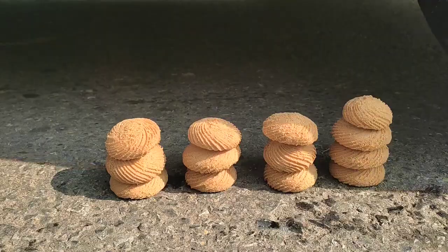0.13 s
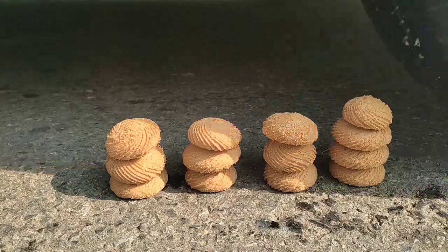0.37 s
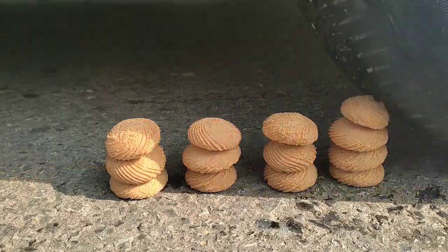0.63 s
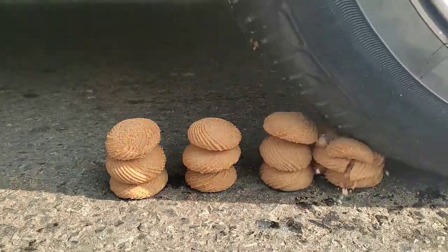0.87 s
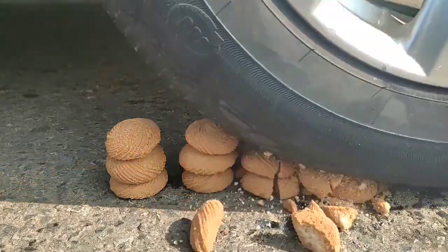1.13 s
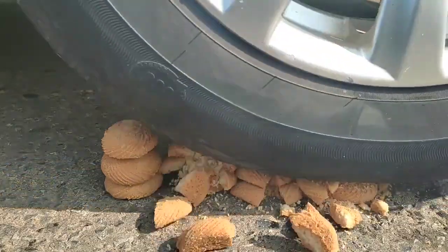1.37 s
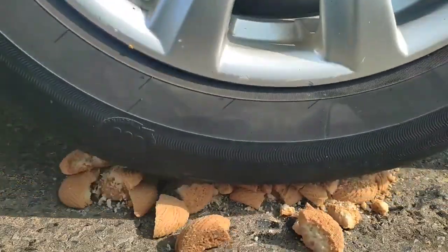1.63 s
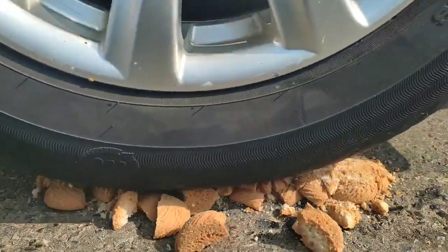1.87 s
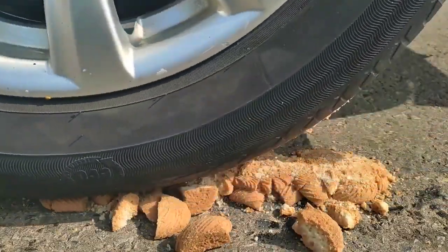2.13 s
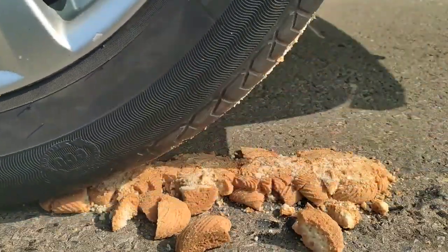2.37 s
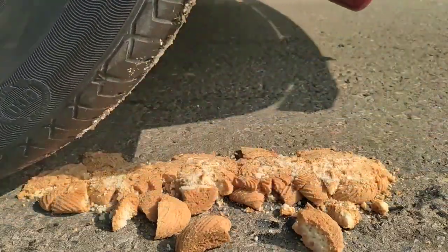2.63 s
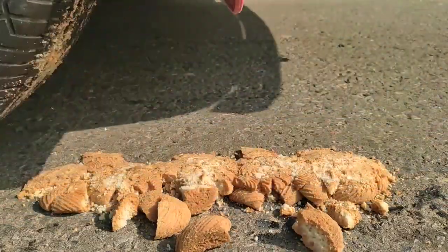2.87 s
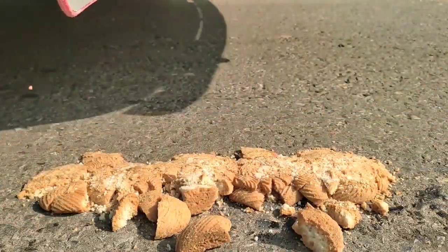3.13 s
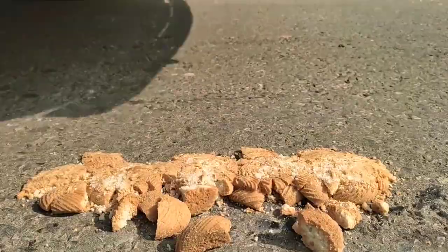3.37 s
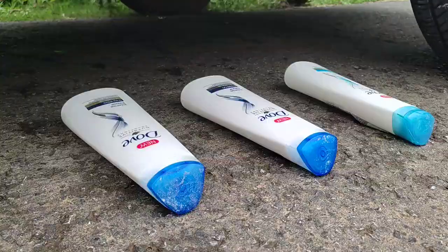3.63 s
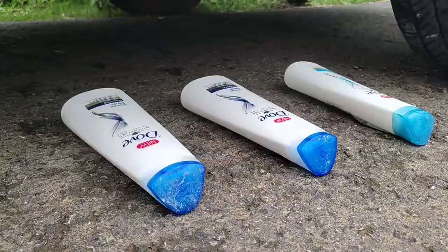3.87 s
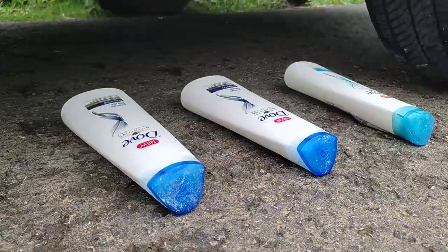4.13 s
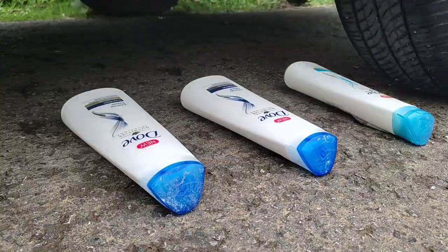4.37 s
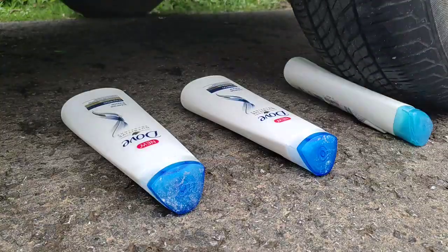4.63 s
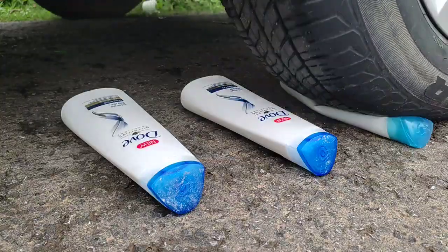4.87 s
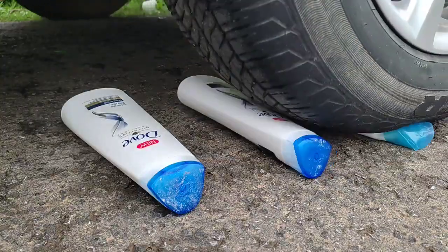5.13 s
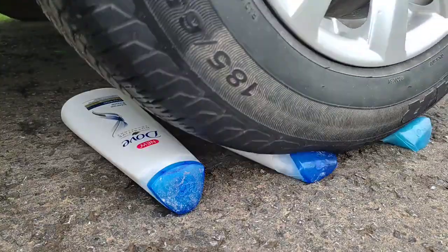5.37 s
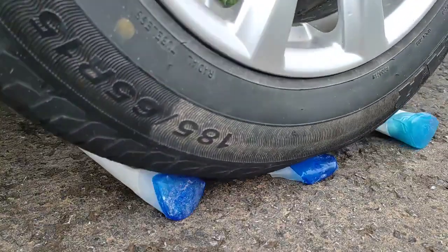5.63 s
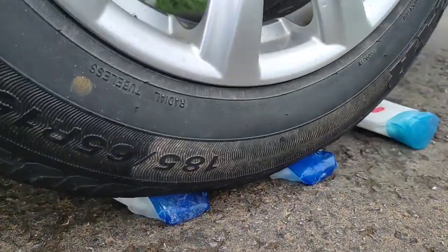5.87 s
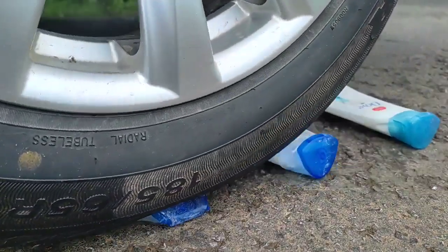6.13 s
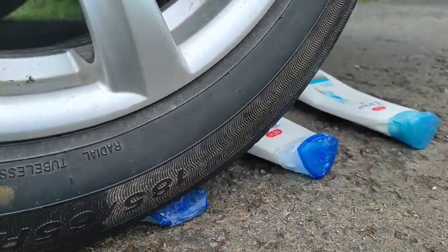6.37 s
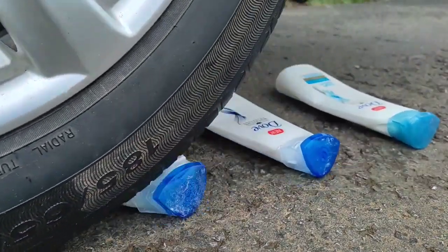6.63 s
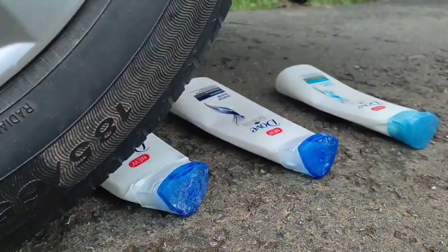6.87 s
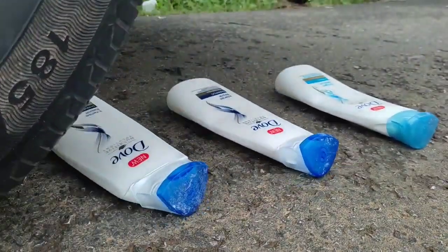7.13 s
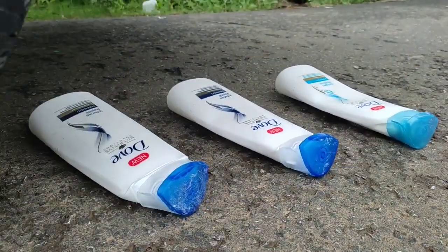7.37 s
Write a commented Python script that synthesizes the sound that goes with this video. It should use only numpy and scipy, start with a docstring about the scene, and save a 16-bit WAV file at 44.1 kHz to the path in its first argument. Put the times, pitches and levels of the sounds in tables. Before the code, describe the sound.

Dry biscuits crunch and crackle under a slow car tyre, then after a brief gap empty plastic bottles pop, hiss and crack loudly.

```python
"""Biscuits crunch, crackle and snap under a slowly creeping car tyre, close to the microphone; after a short silence
it rolls over three empty plastic bottles: walls pop and creak, caps hiss, plastic cracks, the last bottle knocks on.
Crushing and hissing are random grains shaped by filters and level curves; cracks and snaps are noise bursts;
popping walls and knocks are decaying resonances. Coloured outdoor noise lies beneath both places."""
import sys
import numpy as np
from scipy import signal
from scipy.fft import rfft, irfft
from scipy.io import wavfile
from scipy.ndimage import uniform_filter1d

SR = 44100
rng = np.random.default_rng(int(sys.argv[2]) if len(sys.argv) > 2 else 0)


def put_to_file(sound):
    """Save the sound as 16-bit audio at rate SR, in the file named by the first command-line argument."""
    columns = np.atleast_2d(sound).T  # one column per channel
    safe = np.clip(columns, -1, 1)
    whole_steps = np.round(safe * 32767)
    wavfile.write(sys.argv[1], SR, whole_steps.astype(np.int16))


def invert_db(level):
    """Linear amplitude ratio for a level in decibels (20 dB per decade), elementwise."""
    return 10 ** (np.asarray(level, dtype=float) / 20)


N = 330511
T = np.arange(N) / SR
PAUSE_START_S, PAUSE_END_S = 3.467, 3.6  # silence between the biscuits and the bottles
RUN_UP_MS = 1.0  # crackle ahead of each sudden break

# bottle wall resonances: (f/Hz, level/dB, t60/s)
WALL_MODES = [(338, -4, 0.034), (465, -8, 0.063), (789, -4.5, 0.069), (863.5, 5.5, 0.057), (969, -2, 0.045),
              (1500, -22, 0.045)]
# noise spectrum of the second place, where the bottles lie: (f/Hz, level/dB)
LANE_SPECTRUM = [(15, -61), (25, -59), (51, -12.5), (113, -1), (257, -10.5), (318, -14), (460, -12.5),
                 (525, -23.5), (781, -18.5), (1400, -26.5), (2710, -26), (3930, -29.5), (5900, -32),
                 (8000, -38), (11000, -30), (14000, -32.5)]


def level(x, db=0):
    """Scale to an rms level."""
    return x * invert_db(db) / np.sqrt(np.mean(x ** 2))


def peak(y, db):
    """Scale so that the mid (first row) peaks at a level."""
    return y * invert_db(db) / np.abs(np.atleast_2d(y)[0]).max()


def add(out, s, y):
    """Mix y in at time s."""
    i = int(s * SR)
    out[..., i:i + y.shape[-1]] += y[..., :max(N - i, 0)]


def colour(x, points):
    """Causal minimum-phase filter through (Hz, dB) points, from the cepstrum of the log gain."""
    hz, db = np.transpose(points)
    grid_hz = np.fft.rfftfreq(4096, 1 / SR)
    log_gain = np.interp(np.log(grid_hz + 1), np.log(hz), db) * np.log(10) / 20
    cepstrum = irfft(log_gain)
    # fold the backward half onto the forward half
    cepstrum[1:2048] *= 2
    cepstrum[2049:] = 0
    impulse = irfft(np.exp(rfft(cepstrum)))
    return signal.oaconvolve(np.atleast_2d(x), impulse[None], axes=1)[:, :N]


def band(x, lo_hz, hi_hz, order=2):
    """Band-pass."""
    return signal.sosfilt(signal.butter(order, [lo_hz, hi_hz], "band", fs=SR, output="sos"), x)


def curves(rows):
    """Gate over the span of a curve table, and its columns interpolated over time."""
    s, *columns = np.transpose(rows)
    return (T >= s[0]) & (T <= s[-1]), [np.interp(T, s, c) for c in columns]


def swells(s, length_s, db, rise, fall, growth=0):
    """Gain of events that rise, hold (growing) and fall at steady dB per second, summed as power."""
    coarse = T[::32]
    since = coarse - np.asarray(s)[:, None]
    hold = length_s[:, None]
    shape_db = rise * np.minimum(since, 0) + growth * np.clip(since, 0, hold) - fall * np.maximum(since - hold, 0)
    power = np.sum(invert_db(np.asarray(db)[:, None] + shape_db) ** 2, axis=0)
    return np.interp(T, coarse, np.sqrt(power))


def walk(rate):
    """Random levels, rate new ones per second, joined by straight slopes."""
    k = int(SR / rate)
    return uniform_filter1d(np.repeat(rng.standard_normal(N // k + 1), k), k)[:N]


def grains(per_s, spread_db, bed):
    """Mid and side of random breakages of uneven size and place, over a bed of finer ones."""
    hit, size, noise = rng.random(N), rng.exponential(size=N), rng.standard_normal((4, N))
    size = (hit < per_s / SR) * invert_db(spread_db * np.minimum(size, 3))
    return level(size * np.sign(noise[:2])) + bed * noise[2:]


def patchy(x, depth_db, rate):
    """Narrow bands swell and fade on their own, as gaps and cavities change shape."""
    edges = np.geomspace(700, 15000, 36)
    return x + sum(band(x, lo, hi) * (invert_db(depth_db * walk(rate)) - 1) for lo, hi in zip(edges, edges[1:]))


def bent(x, share, rate):
    """All resonances drift up and down together as the plastic changes shape."""
    bend = share * walk(rate)
    # a wandering read position, kept from drifting away over half a second
    place = np.arange(N) + np.cumsum(bend - uniform_filter1d(bend, SR // 2))
    return np.array([np.interp(place, np.arange(N), row) for row in x])


def ring(modes, push_ms, phase):
    """Modes set ringing by a push of finite length, peak 1."""
    t = np.arange(SR // 5) / SR
    y = np.zeros(len(t))
    for (hz, db, t60), p in zip(modes, phase):
        y += invert_db(db) * np.sin(2 * np.pi * hz * t + p) * np.exp(-np.log(1000) * t / t60)
    y = y * (1 - np.exp(-(t / (push_ms / 1000)) ** 2))
    return y / np.abs(y).max()


def burst(noise, click_ms, t60_ms, tail_db=-4):
    """A crackle that runs up to a sudden break, then a noise click with a weaker, longer tail."""
    ms = 1000 * np.arange(noise.shape[-1]) / SR - RUN_UP_MS
    # the break itself: one strong sample, in the mid only
    onset = 9.7 * (np.arange(len(ms)) == np.argmax(ms >= 0)) * np.array([[1], [0]])
    after = np.exp(-ms / click_ms) + invert_db(tail_db) * np.exp(-np.log(1000) * ms / t60_ms)
    return onset + noise * np.where(ms < 0, (1 + ms / RUN_UP_MS) ** 2, after)


def crushed_biscuits():
    """Big lumps crush dully, crumbs crackle and dust fizzes, all in clumps; heavier load crushes bigger lumps."""
    # crumb spectrum: (f/Hz, level/dB)
    crumb_spectrum = [(29, -34), (50, -23), (108, 3.5), (160, -3), (192, 5.5), (248, -5), (338, -0.5),
                      (516, -13), (623, -7.5), (847, -10.5), (5080, -22.5), (8330, -21), (11100, -16),
                      (14000, -21)]
    # tyre grinding the crumbs: (t/s, crackle level/dB, fine dust re crackle/dB)
    grind_curve = [(0, -53, -2), (0.3, -57.5, 2), (0.48, -47.5, -0.5), (0.56, -58, 12.5),
                   (0.72, -52.5, 9.5), (0.765, -44, 9.5), (0.79, -48, 10), (0.9, -32.5, -1.5),
                   (1.24, -32.5, -0.5), (1.55, -34, -11.5), (1.75, -37.5, 2), (2.2, -42, -6.5),
                   (2.3, -45.5, -0.5), (2.45, -54, 1.5), (2.7, -57, -3), (2.95, -62, -11), (3.07, -58, 5),
                   (3.2, -61, -15), (3.46, -51, -4)]
    # stacks and big lumps caving in: (t/s, length/s, dull crush level/dB, dust level/dB)
    cave_ins = [(0.204, 0.018, -44.5, -50.5), (0.3, 0.024, -40.5, -47.5), (0.428, .03, -43, -60),
                (0.448, 0.025, -38, -64), (0.772, 0.015, -32, -28.5), (0.822, 0.025, -32.5, -29.5),
                (0.917, 0.045, -24.5, -37.5), (1.049, 0.037, -26.5, -36.5), (1.18, .01, -48, -41),
                (1.294, 0.014, -28, -30), (1.373, 0.081, -27.5, -35.5), (1.533, 0.052, -26.5, -32.5),
                (1.442, 0.11, -36, -35.5), (1.747, 0.2, -30.5, -63), (1.98, 0.089, -33, -36.5),
                (2.085, 0.028, -35.5, -39), (2.146, 0.049, -44, -39.5), (2.337, .02, -61, -63)]
    heavy_db, lumps_db, lump_growth = -30, -28.5, 1.2  # crush is lumps_db at crackle heavy_db; dB per dB
    rise_db_per_s, fall_db_per_s = 2198, 136.5

    on, (grind_db, fine_db) = curves(grind_curve)
    s, length_s, dull_db, dust_db = np.transpose(cave_ins)
    cave_dull = swells(s, length_s, dull_db, rise_db_per_s, fall_db_per_s)
    cave_dust = swells(s, length_s, dust_db, rise_db_per_s, fall_db_per_s)
    clump = walk(45.08)

    lumps = colour(grains(250, 3.1, 0.86), crumb_spectrum)
    crush = level(band(lumps, 40, 1400)) * invert_db(0.72 * clump)
    # pieces of each size break on their own
    sizes_hz = np.geomspace(400, 8000, 5)
    pieces = sum(band(grains(500, 3.5, .7), lo, hi) for lo, hi in zip(sizes_hz, sizes_hz[1:]))
    fractures = patchy(colour(pieces, crumb_spectrum), 2.5, 30) * np.array([[1], [.75]])
    crackle = level(band(fractures, 534, 6400)) * invert_db(1.6 * clump + 0.5 * walk(100))
    powder = colour(grains(4400, 1.0, 1.0), crumb_spectrum)
    dust = level(band(powder, 2600, 22040)) * invert_db(1.1 * clump + 1.2 * walk(120))

    crush_gain = np.hypot(invert_db(lump_growth * (grind_db - heavy_db) + lumps_db), cave_dull)
    dust_gain = np.hypot(invert_db(grind_db + fine_db), cave_dust)
    return on * (crush_gain * crush + invert_db(grind_db) * crackle + dust_gain * dust)


def biscuit_snaps():
    """Whole biscuits snap: a mid-range noise burst with a low thud and a bright tick."""
    # snaps: (t/s, peak level/dB, thud re peak/dB, tick re peak/dB)
    snap_list = [(0.194, -38.5, 5, -5), (0.3, -39.5, 7, -16), (0.449, -36, 4, -20), (0.481, -34, 3.5, -13),
                 (0.529, -31.5, -24, 6), (0.77, -27, 5.5, -6), (0.826, -28.5, 4, -3.5), (0.85, -29, 4, -14),
                 (0.906, -29.5, 3.5, -17.5), (0.932, -23.5, -3, -22), (0.966, -27, 0, -24),
                 (0.993, -36, -16, -10), (1.0411, -24.5, -12, 15.5), (1.046, -31.5, 9, -18),
                 (1.086, -32, 4, -18.5), (1.108, -22, -14, -10), (1.115, -13.5, -18, -12),
                 (1.291, -21, -3, -7.5), (1.363, -23.5, 3, -11), (1.451, -18, -9, -17),
                 (1.485, -22, -3, -10.5), (1.533, -34, -20, -9), (1.571, -28, -8, -10),
                 (1.664, -26.5, 7, -20.5), (1.794, -34, 12, -20), (1.835, -29, 3, -15),
                 (1.861, -49, 7, -15), (1.924, -33, 1, -17), (1.978, -29.5, 9.5, -19),
                 (2.028, -23.5, -4, -15), (2.096, -29.5, 1.5, -17), (2.18, -27, 0, -6.5),
                 (2.237, -25, -10, -17), (2.3, -25.5, -3, -13.5), (2.372, -37.5, 0, -17),
                 (2.439, -44, 3, -13)]
    out, noise = np.zeros((2, N)), rng.standard_normal((len(snap_list), 3, 2, 4000))
    for (s, db, thud_db, tick_db), (a, b, c) in zip(snap_list, noise):
        add(out, s, peak(band(burst(a, 1.4, 60), 300, 1200), db))
        add(out, s, peak(band(burst(b, 20.0, 140), 90, 540), db + thud_db))
        add(out, s, peak(band(burst(c, 5.0, 40), 2500, 19000), db + tick_db))
    return out


def buckles():
    """Walls pop in or out, each ringing softly; the flatter the bottle, the higher its upper modes."""
    # pops: (t/s, upper ring level/dB, main ring f/Hz, low rings re upper/dB, ring length as a share)
    pops = [(4.576, -19, 996, 1, 1), (4.58, -2.5, 838, -6.5, 0.38), (4.6, -15, 830, 1, 0.64),
            (4.618, -26, 840, -3, 0.65), (5.069, -37, 810, 16, 0.42), (5.0842, 0.5, 804, -9, 0.49),
            (5.1123, -2, 773, -10.5, 1), (5.121, -10.5, 842, 6, 1), (5.257, -15.5, 960, -30, 0.38),
            (5.362, -15.5, 1203, -32, 1), (5.382, -17, 1117, -25, 0.96), (5.394, -9.5, 851, -46, 1),
            (5.521, -25, 624, 13, 1), (5.537, -14, 820, 7.5, 0.38), (5.55, -29, 633, 13, 0.94),
            (5.736, -10.5, 1050, -14, 0.81), (5.753, -8.5, 984, -14, 0.38), (5.76, -18, 972, -32, 0.86),
            (5.776, -26, 872, -2, 0.74), (6.017, -21.5, 940, -31, 0.089), (6.043, -7.5, 850, -13, 0.23),
            (6.054, -15, 1004, -10, 0.26), (6.611, -21.5, 803, -3, 0.62), (6.72, -21, 746, 0, 0.081),
            (6.739, -28.5, 680, -25, 0.98)]
    out, chance = np.zeros(N), rng.random((len(pops), len(WALL_MODES)))
    main_hz = WALL_MODES[3][0]
    for (s, db, hz, low_db, share), c in zip(pops, chance):
        upper = [(f * hz / main_hz, g, t60 * max(share, .1)) for f, g, t60 in WALL_MODES[2:]]
        add(out, s, invert_db(db) * ring(upper, 3.2, 2.17 * c[2:]))
        add(out, s, invert_db(db + low_db) * ring(WALL_MODES[:2], 1.0, 3.9 * c[:2]))
    return out


def cracks():
    """Creased plastic and grit: a short dull noise ring, a sharp click and a fizz on top, a little to the left."""
    # cracks and ticks: (t/s, peak level/dB, dull ring f/Hz, click re peak/dB, fizz re peak/dB)
    crack_list = [(0.579, -43, 2100, 2, 19), (3.05, -41, 2280, 6, -11), (3.083, -43, 1100, 3, -20),
                  (3.2985, -38.5, 487, -8, -22), (3.2995, -36, 1690, -12, -22), (3.334, -41, 1170, 4, -20),
                  (3.3995, -31.5, 1090, -5, -22), (3.647, -35.5, 1440, -0.5, -17),
                  (3.8132, -32.5, 1840, -17, -10), (4.15, -37.5, 930, 2, -1),
                  (4.186, -37.5, 3730, -10, -22), (4.3043, -39, 3900, -13, -20),
                  (4.4814, -39, 3780, -13, -20), (4.5921, -21, 1030, -3, -9), (4.665, -35, 1240, -5, 2),
                  (4.698, -40.5, 950, 14, 4), (5.289, -1.5, 2270, -26, -26), (5.453, -22, 1120, 9.5, 7),
                  (5.5264, -11.5, 960, -1.5, -3), (5.6162, -6.5, 1690, -7, -8),
                  (5.7974, -9, 1330, -13, -32), (5.8205, -26, 1020, -1, 6), (5.8243, -13, 1020, 9, 7),
                  (5.83, -22.5, 1900, 4, 6), (5.9082, -15, 1160, -10.5, -21), (5.9492, -23.5, 1160, 0, -9),
                  (5.9672, -23, 1250, -1, -7), (6.0405, -9, 1020, 5.5, -9), (6.0618, -27, 1230, 5, -5),
                  (6.1, -14, 1500, -22, -42), (6.105, -9, 1620, -16, -39), (6.1107, -14, 1080, -33, -40),
                  (6.1193, -5, 1120, -28, -42), (6.1349, -13.5, 969, -22, -26),
                  (6.1391, -8.5, 1450, -32, -25), (6.149, -13.5, 1150, -32, -34),
                  (6.161, -31, 1620, -22, -24), (6.2247, -47.5, 1890, 4, 15.5), (6.277, -31, 885, -10, -11),
                  (6.2831, -18, 1170, -29, -31), (6.322, -33, 1230, -18, -14),
                  (6.36, -31.5, 1150, -18, -13), (6.3888, -28.5, 1120, -13, -30),
                  (6.4475, -31, 1100, -7, -18), (6.492, -37, 1200, -15, 0), (6.5555, -21, 1110, -5, -9.5),
                  (6.709, -31, 1110, -14, -25), (6.72, -24.5, 1270, -23, -28), (6.303, -35, 1500, -15, -16),
                  (6.618, -20, 1130, -17, -30), (6.63, -22, 1030, -15, -30), (6.74, -31, 1280, -21, -24),
                  (6.6107, -17.5, 1010, 11.5, -14), (6.622, -39, 1500, 2, -10), (6.638, -42, 1500, 2, -12),
                  (7.0256, -35, 1990, -3, -7), (7.244, -39, 1900, -7, -10), (7.34, -39, 2100, -11, -10)]
    # rings of the broken edge: (f/Hz, level/dB, t60/s)
    edge_modes = [(2600, -4, .012), (3450, 0, .018), (5000, -4, .014), (6050, -2, .012)]
    pan_db = 2  # left minus right
    pan = np.tanh(pan_db * np.log(10) / 40)  # share of the mid fed to the side
    out, noise = np.zeros((2, N)), rng.standard_normal((len(crack_list), 3, 2, 4000))
    chance = rng.standard_normal((len(crack_list), len(edge_modes), 2))
    for (s, db, hz, click_db, fizz_db), (a, b, c), odd in zip(crack_list, noise, chance):
        dull = peak(band(burst(a, 0.71, 71), hz / 1.58, hz * 1.35, order=3), db)
        click = peak(band(burst(b, 0.84, 41, -6.0), 2070, 5570, order=3), db + click_db)
        fizz = peak(band(burst(c, 2.5, 42), 9600, 12300), db + fizz_db)
        mid, side = dull + click + fizz
        add(out, s, np.array([mid, 1.5 * side + pan * mid]))
        # no two edges ring quite alike
        edge = [(f * (1 + .05 * u), g + 3 * v, t60) for (f, g, t60), (u, v) in zip(edge_modes, odd)]
        add(out[0], s + RUN_UP_MS / 1000, invert_db(db + click_db - 7.5) * ring(edge, 0.5, np.zeros(4)))
    return out


def creak():
    """Small slips of tread on plastic rattle the wall modes, their pitch wandering; whole bottles groan below."""
    # tread working the walls: (t/s, creak level/dB)
    creak_curve = [(4.57, -49), (4.68, -36), (4.76, -48), (4.86, -37), (5.0, -41), (5.1, -44), (5.2, -40.5),
                   (5.25, -29.5), (5.36, -29), (5.43, -35.5), (5.47, -26), (5.57, -31.5), (5.6, -26.5),
                   (5.79, -28), (5.85, -44.5), (6.09, -41), (6.105, -58), (6.15, -34.5), (6.19, -60),
                   (6.23, -77), (6.45, -55), (6.54, -41), (6.6, -40.5), (6.65, -40.5), (6.78, -62),
                   (6.83, -87)]
    # bottles groaning as the load shifts: (t/s, length/s, level/dB)
    groan_list = [(4.586, 0.01, -26), (5.078, 0.052, -30.5), (5.461, 0.092, -25.5), (5.788, 0.0096, -29),
                  (6.053, 0.064, -35), (5.711, 0.038, -35), (6.268, 0.014, -40), (6.389, 0.049, -42),
                  (6.51, 0.088, -41.5), (6.599, 0.024, -33.5), (6.701, 0.015, -35)]
    rise_db_per_s, fall_db_per_s, groan_bed_db = 1204, 170, -13.5  # bed re creak

    on, (creak_db,) = curves(creak_curve)
    wall = ring(WALL_MODES[2:], 0.23, np.zeros(4))
    rattle = signal.oaconvolve(grains(200, 4.0, 0.91), wall[None], axes=1)[:, :N]
    rattle = bent(rattle, .07, 25)
    groan = band(grains(350, 10.2, 0.61), 155, 490, order=3)
    shifts = swells(*np.transpose(groan_list), rise_db_per_s, fall_db_per_s)
    load = np.hypot(shifts, on * invert_db(creak_db + groan_bed_db))
    return on * invert_db(creak_db) * level(rattle) + load * level(groan)


def air_jet():
    """Squeezed air sputters through the caps: a bright jet, a duller body and a middle band."""
    # jet spectrum: (f/Hz, level/dB)
    jet_spectrum = [(590, -34.5), (1000, 6), (1400, 10), (1750, 15.5), (1950, 13.5), (2200, 16), (2450, 8),
                    (2850, 15.5), (3150, 3), (3560, -0.5), (5000, 0), (7630, -7), (9400, -4.5), (10700, -1),
                    (11700, -4.5), (13000, 3), (14000, -7.5)]
    # squirts: (t/s, length/s, jet level/dB, body re jet/dB, middle re jet/dB)
    squirts = [(4.601, 0.0046, -49, 12.5, 9.5), (4.661, 0.048, -50.5, 4, 5.5),
               (4.827, 0.15, -19.5, -9, -15), (4.962, 0.11, -23, -7.5, -4), (5.251, 0.031, -21.5, 3, -1.5),
               (5.322, 0.026, -22, -1.5, 0.5), (5.363, 0.036, -33, 8.5, 2), (5.449, 0.026, -38.5, -1, -2.5),
               (5.531, .005, -32.5, 3, 4.5), (5.591, 0.072, -34, 2, -0.5), (5.677, 0.04, -22.5, -1.5, 0),
               (5.748, 0.022, -29.5, 4.5, -1.5), (5.83, 0.025, -37, -4, 0), (5.94, 0.13, -50.5, 3, 1),
               (6.077, 0.095, -54, 8, 3), (6.267, 0.057, -54, -1, 0), (6.49, 0.16, -54, 5.5, 1.5),
               (6.726, 0.011, -65.5, 10, 15)]
    rise_db_per_s, fall_db_per_s = 404, 604
    leak_db, leak_fall_db_per_s = -16.5, 108  # after a squirt a little air keeps seeping out
    opening_db_per_s = 27.5  # the gap widens during a squirt, so its lower bands grow
    s, length_s, jet_db, body_db, middle_db = np.transpose(squirts)

    def flow(db, growth):
        """Squirts and their slower leaks, summed as power."""
        squirt = swells(s, length_s, db, rise_db_per_s, fall_db_per_s, growth)
        leak = swells(s, length_s, db + leak_db, rise_db_per_s, leak_fall_db_per_s, growth)
        return np.hypot(squirt, leak)

    air = patchy(bent(colour(grains(4000, 2.5, 1.1), jet_spectrum), .02, 10), 1.8, 30)
    sputter = walk(250)
    top = level(band(air, 9700, 22040, order=3)) * invert_db(1.0 * walk(40) + 0.98 * sputter)
    body = level(band(air, 1050, 3510, order=3)) * invert_db(1.0 * walk(280) + 0.28 * sputter + 0.95 * walk(90))
    middle = level(band(air, 3370, 7800, order=3)) * invert_db(1.7 * sputter)
    return (flow(jet_db, -18.0) * top + flow(jet_db + body_db, opening_db_per_s) * body
            + flow(jet_db + middle_db, opening_db_per_s) * middle)


def squeak():
    """Trapped air squeaks past the cap: a short clear tone that rises a little."""
    # squeaks: (t/s, length/s, peak level/dB, start f/Hz, end f/Hz)
    squeak_list = [(4.75, .045, -35, 430, 470)]
    out = np.zeros(N)
    for s, length_s, db, from_hz, to_hz in squeak_list:
        u = np.linspace(0, 1, int(length_s * SR))
        envelope = np.sqrt(np.abs(np.sin(np.pi * u)))
        phase = 2 * np.pi * np.cumsum(from_hz + (to_hz - from_hz) * u) / SR
        add(out, s, invert_db(db) * envelope * np.sin(phase))
    return out


def puffs():
    """Air puffs reach the microphone, each a slow pressure swing that dies away."""
    # puffs: (t/s, peak level/dB, swing period/ms)
    puff_list = [(5.089, -57, 8.5), (5.287, -37, 9.4), (5.615, -24.5, 6.6), (5.818, -20.5, 8.5),
                 (6.039, -37, 14), (6.615, -27, 8.9), (6.723, -34, 11)]
    out = np.zeros(N)
    for s, db, ms in puff_list:
        u = np.arange(SR // 5) / SR / (ms / 1000)
        add(out, s, peak(np.sin(2 * np.pi * u) * u * np.exp(-2.5 * u), db))
    return out


def knocks():
    """The freed bottle knocks hollowly: two soft contacts, one end after the other, never twice alike."""
    # double knocks: (t/s, peak level/dB)
    knock_list = [(6.274, -40), (6.405, -30.5), (6.516, -28), (6.625, -22.5), (6.724, -18.5), (6.753, -28),
                  (6.882, -30.5), (6.971, -28.5), (7.095, -30), (7.179, -28.5), (7.289, -31.5),
                  (7.362, -28), (7.467, -30.5)]
    # resonances of the hollow bottle: (f/Hz, level/dB, t60/s)
    hollow_modes = [(205, -10, 0.08), (345.3, -2.5, 0.056), (503, -13.5, 0.035), (915, -21.5, 0.06),
                    (1254, -8, 0.019)]
    second_s, second_db = .021, -7  # typical delay and level of the other end landing
    out, chance = np.zeros(N), rng.standard_normal((len(knock_list), 2 + len(hollow_modes)))
    for (s, db), c in zip(knock_list, chance):
        modes = [(hz * (1 + .02 * v), g + 2.5 * v, t60) for (hz, g, t60), v in zip(hollow_modes, c[2:])]
        body = ring(modes, 7.1, np.zeros(5))
        add(out, s, invert_db(db) * body)
        add(out, s + second_s * (1 + .15 * c[0]), invert_db(db + second_db + 4 * c[1]) * body)
    return out


def tyre_on_grit():
    """Bright, dense grains rustle as the tyre rolls over grit."""
    # rustle: (t/s, level/dB)
    rustle_curve = [(3.6, -85), (3.64, -60), (3.87, -50), (4.002, -77), (4.108, -46), (4.262, -94),
                    (4.56, -68)]
    rolling, (grit_db,) = curves(rustle_curve)
    grit = colour(grains(2800, 4.5, 0.75), LANE_SPECTRUM)
    return rolling * invert_db(grit_db) * level(band(grit, 3800, 18000))


def outdoors(points, db, swell_db):
    """Distant traffic and idling car, swelling a little, with stray crumbs and grit ticking under the tyre."""
    return level(colour(grains(120, 2.2, 2.0), points), db) * invert_db(swell_db * walk(9.1))


def background():
    """Outdoor noise of the first place, then of the second."""
    # noise spectrum of the first place: (f/Hz, level/dB)
    yard_spectrum = [(15, -23), (25, -10.5), (74, 5), (231, -2), (271, -1), (344, -4), (414, -2),
                     (966, -27.5), (1130, -13), (6500, -23), (11000, -19.5), (14000, -21)]
    yard = outdoors(yard_spectrum, -48, 0.15)
    lane = outdoors(LANE_SPECTRUM, -46.5, 0.33)
    return np.where(T < PAUSE_START_S, yard, lane)


def widen(mid, side):
    """Two microphone ports hear bass alike and treble differently; the nearer one hears the sound first."""
    # side re mid: (f/Hz, gain/dB)
    width_curve = [(30, 3), (70, -17.5), (300, -9), (700, -5.5), (1400, -3), (3000, 1.5), (7000, -3),
                   (14000, -3.5)]
    nearer = np.where(T < PAUSE_START_S, 1, -1)  # left with the biscuits, right with the bottles
    lead = .4 * nearer * (np.roll(mid, -4) - np.roll(mid, 4))
    side = colour(side, width_curve)[0] + band(lead, 337, 5000)
    return np.array([mid + side, mid - side])


def scene():
    """Biscuits in the first place, silence, then bottles in the second."""
    crushing = crushed_biscuits() + biscuit_snaps()
    mid, side = crushing + cracks() + creak() + air_jet() + tyre_on_grit() + background()
    body, wind = buckles() + knocks() + squeak(), puffs()
    # the ringing bottle is a wide source: its side part arrives half a millisecond later
    side = side + 0.2 * np.roll(body, 22) + wind
    sounding = (T < PAUSE_START_S) | (T > PAUSE_END_S)
    return widen(mid + body + wind, side) * sounding


def top_cut(x):
    """Nothing passes above the cut-off."""
    return signal.sosfilt(signal.butter(12, 15300, fs=SR, output="sos"), x)


def record(dry):
    """The ports differ in tone, the left far brighter near 11 kHz; bass and top are cut, loud peaks rounded."""
    # left minus right: (f/Hz, gain/dB)
    port_curve = [(60, 0.5), (400, 0), (1300, 1), (4300, 0.5), (8000, -2.5), (11000, 15), (14000, 3.5)]
    top_hz = 13900
    hz, db = np.transpose(port_curve)
    left = colour(dry[0], np.transpose([hz, db / 2]))
    right = colour(dry[1], np.transpose([hz, -db / 2]))
    ports = band(np.vstack([left, right]), 39, 22040, order=1)
    ports = 0.85 * np.tanh(ports / 0.95)
    mix = signal.sosfilt(signal.ellip(8, .3, 42, top_hz, fs=SR, output="sos"), ports)
    return top_cut(mix)


dry = scene()
out = record(dry)
put_to_file(out)
```